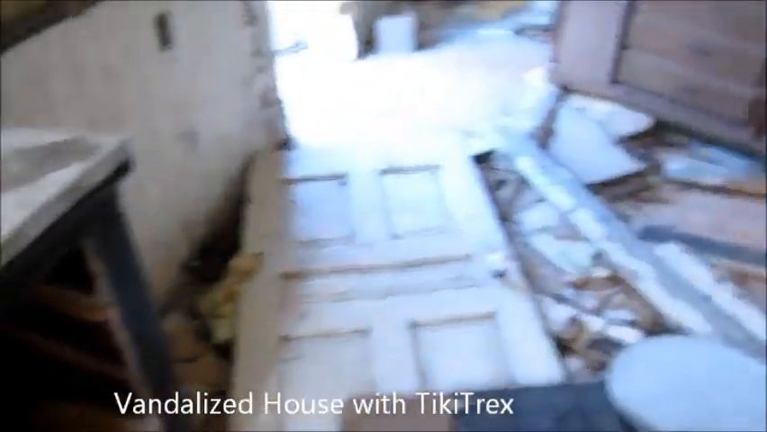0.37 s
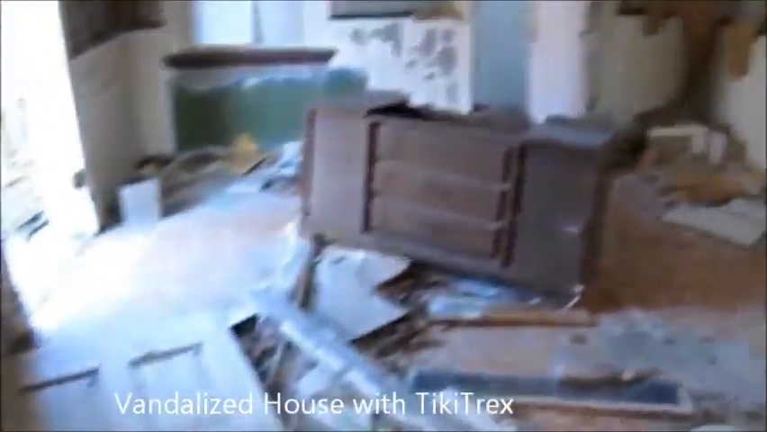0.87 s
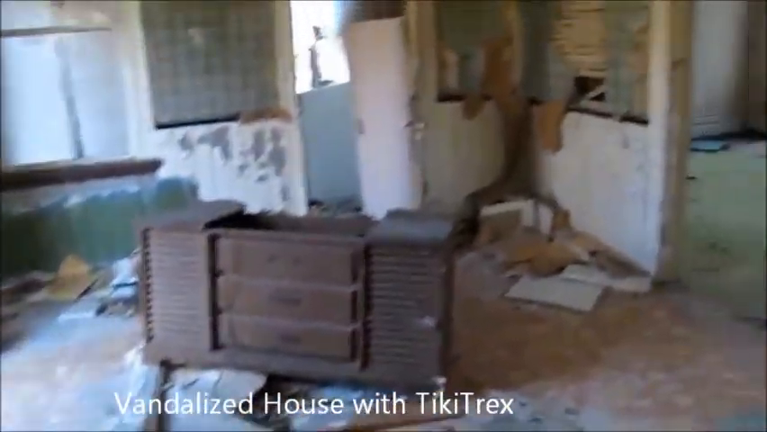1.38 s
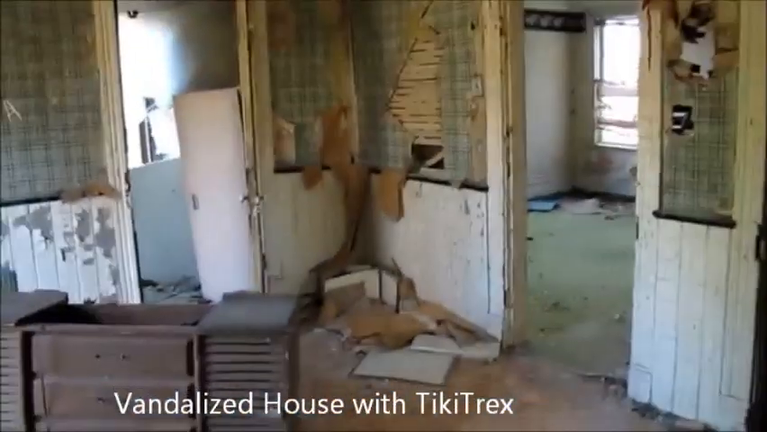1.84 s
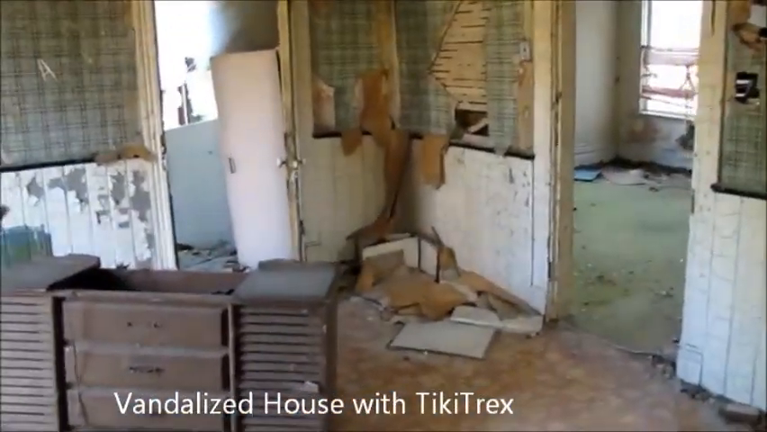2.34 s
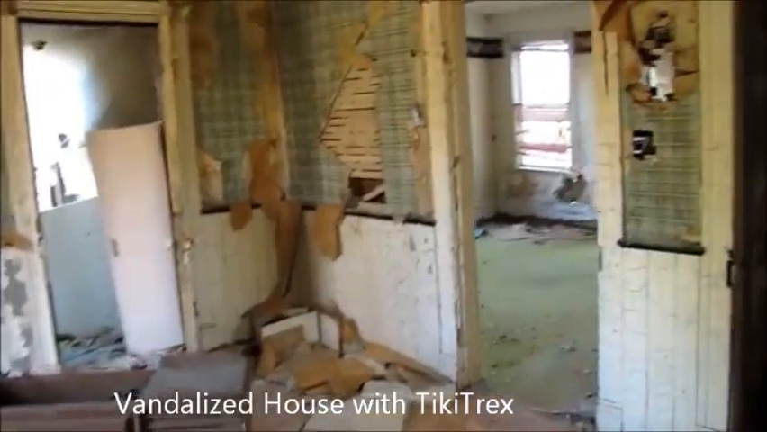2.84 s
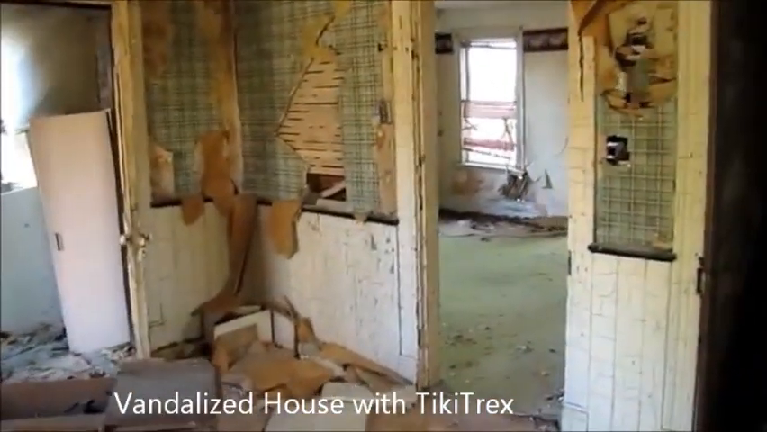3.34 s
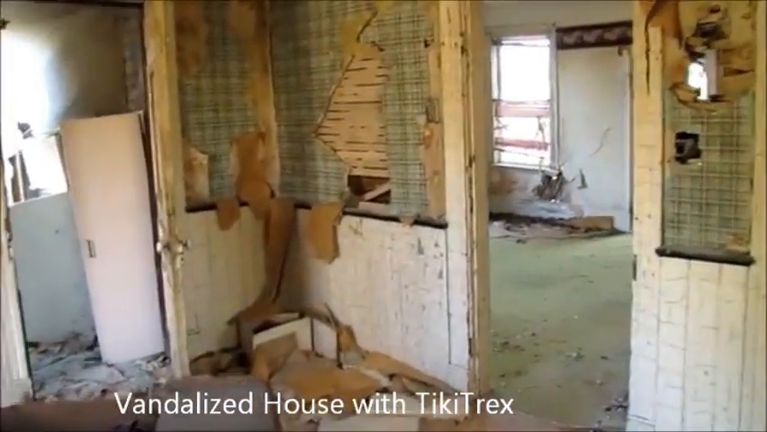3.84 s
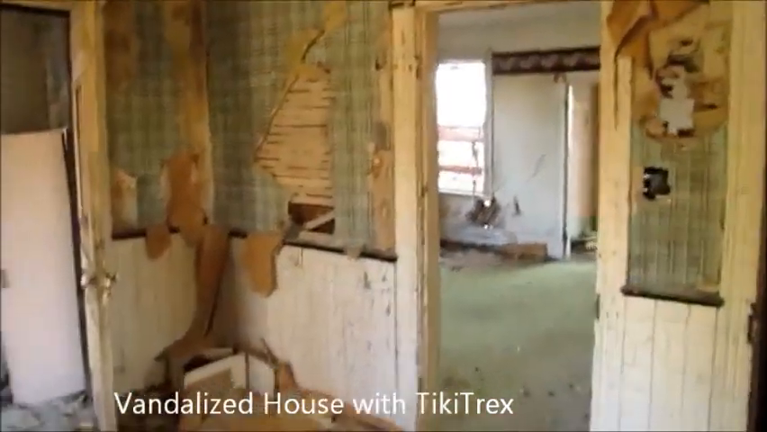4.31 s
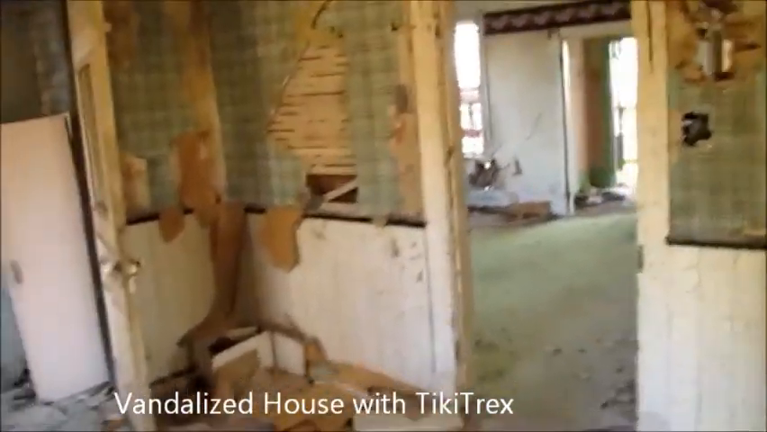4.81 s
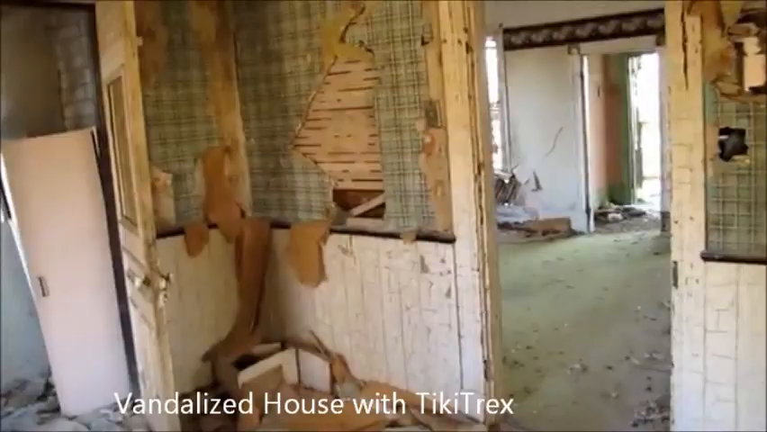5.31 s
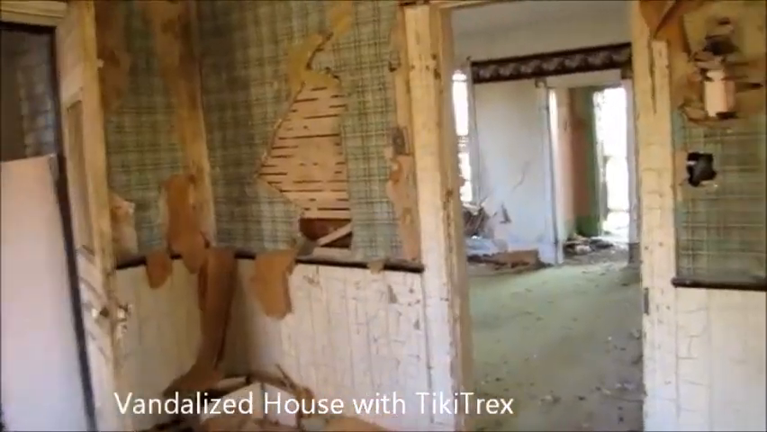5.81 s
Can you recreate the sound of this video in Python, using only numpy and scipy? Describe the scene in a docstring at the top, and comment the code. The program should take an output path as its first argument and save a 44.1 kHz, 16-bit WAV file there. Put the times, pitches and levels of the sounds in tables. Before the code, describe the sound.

In a bare, abandoned house, someone moves slowly over a wooden floor strewn with debris, heard close in stereo. From 0 to 1 s there are only small grit crunches and dry ticks. Soft steps land around 1.0 and 1.27 s, with low air bumps near 1.4 s. At 1.7 s a crunching step kicks a loose shard, which clinks with a short hollow ring. A lone dull thump follows at 2.7 s, then a sharp splintery crackle at 3.2 s and a lull with light ticks. At 4.1 s a knock leads into a loud, rumbling clatter of boards from 4.25 to 4.45 s, with crunches and snaps; more scuffing knocks continue to 5.3 s. Near 5.06 s a higher shard clacks and briefly squeaks. It then quietens, with air jolts around 6 s. A faint outdoor hush, low hum and brief faint whines lie behind; the room echoes shortly.

```python
"""Someone walks across a littered wooden floor in a bare, empty house; the bare walls ring on after each step.
Soles knock on the boards (struck modes and a bare push), crush grit (clumped ringing crumbs) and snap
splinters (cracks with a short ring). Two loose shards are kicked (struck modes); one squeaks (gliding sine).
Behind: an outdoor hush (shaped noise), a low hum and faint whines (wavering sines), puffs and jolts of air
on the microphones (low noise and single swings)."""
import sys
import numpy as np
from scipy import signal
from scipy.io import wavfile
from scipy.ndimage import map_coordinates

SR = 44100
rng = np.random.default_rng(int(sys.argv[2]) if len(sys.argv) > 2 else 0)


def boost_factor(decibels):
    """Convert a level in decibels to a linear amplitude factor."""
    exponent = np.asarray(decibels, float) / 20
    return 10 ** exponent


def log_audio(samples):
    """Write samples as a 16-bit WAV file to the path given in sys.argv[1]."""
    # one column per channel
    frames = np.atleast_2d(samples).T
    # limit to full scale, then quantise
    limited = np.clip(frames, -1, 1)
    pcm = np.round(limited * 32767).astype(np.int16)
    wavfile.write(sys.argv[1], SR, pcm)


N = 272582

# Soles on the boards. Each row: time in seconds, strength in dB, centre of the modes struck in Hz,
# spread in octaves.
KNOCKS = [(1.013, -35, 935, 0.088), (1.082, -20.5, 1200, 0.13), (1.091, -26.5, 300, 0.31),
          (1.266, -25, 324, 0.22), (1.691, -32, 900, 1.1), (1.699, -20, 332, 0.32), (1.718, -15, 356, 0.39),
          (1.727, -17.5, 400, 0.44), (1.738, -22, 320, 0.24), (1.956, -25, 380, 0.81),
          (1.98, -28.5, 300, 0.84), (2.724, -8.5, 270, 0.33), (2.726, -12, 680, 0.3), (2.735, -22, 610, .6),
          (2.75, -29.5, 1000, 0.72), (2.726, -30, 2000, 0.49), (2.769, -14, 302, 0.23),
          (3.1955, -31.5, 686, 0.74), (3.2022, -19, 790, 0.56), (3.219, -26, 577, 0.77),
          (3.826, -37.5, 500, 1.2), (3.959, -27, 347, 2.04), (4.017, -27.5, 247, 1.5),
          (4.118, -30, 685, 0.4), (4.12, -11.5, 214, 0.43), (4.256, -22.5, 900, 0.53),
          (4.267, -5.5, 258, 1.3), (4.286, -13.5, 500, 1), (4.301, -10, 454, 1.5), (4.312, -8.5, 1300, 0.7),
          (4.322, -10.5, 610, 0.67), (4.333, -13.5, 1000, 1.2), (4.344, -13, 395, 1.7),
          (4.374, -6, 400, 1.3), (4.3822, -12, 350, 0.84), (4.388, -28, 204, 1), (4.396, -7.5, 258, 0.76),
          (4.406, -8, 260, 1.07), (4.42, -9, 238, 0.9), (4.431, -13, 200, 0.68), (4.445, -9.5, 500, 0.65),
          (4.584, -15, 590, 1.4), (4.744, -13, 203, 1.24), (4.756, -13, 330, 0.62),
          (4.82, -16.5, 560, 0.64), (4.8274, -19, 797, 0.77), (5.056, -17, 636, 0.86),
          (5.172, -20, 670, 0.42), (5.186, -16, 680, 0.61), (5.2228, -3, 376, 0.6),
          (5.2278, -14, 1000, 0.39), (5.233, -14.5, 596, 0.57), (5.245, -14.5, 553, 0.52),
          (5.289, -15.5, 220, 0.74), (5.349, -28.5, 250, 1.7)]
# Modes of the boards. Each row: pitch in Hz, relative level in dB, t60 in seconds.
BOARD_MODES = [(139.4, 7, 0.093), (157, 3.5, 0.17), (172.4, 1.5, 0.22), (200.4, 3.5, 0.074),
               (236.3, 3.5, 0.078), (292, 3, 0.081), (334, 1, 0.067), (382, 5, 0.056), (423, 3.5, 0.068),
               (500, 5.5, 0.022), (560, 10, 0.018), (673, 4.5, 0.071), (777, 7, 0.024), (870, 7, 0.015),
               (947, 0.5, 0.072), (1069, 3, 0.04), (1200, 3, 0.031), (1300, -11, 0.0153),
               (1440, -2.5, 0.053), (1635, -1, 0.033), (1890, -7.5, 0.022), (2050, 7.5, 0.025),
               (2460, -2.5, 0.021)]
# Weight dragged over the boards. Each row: time in seconds, rms drive into the modes in dB.
DRAG = [(0, -105), (0.6, -101.5), (0.95, -100), (1.15, -112), (1.7, -109), (2.0, -106), (2.15, -106),
        (3.3, -109), (3.6, -105), (4.0, -120), (4.15, -86.5), (4.43, -77), (4.56, -85.5), (4.6, -78),
        (4.7, -71.5), (4.73, -97), (4.89, -108), (4.95, -76), (5.05, -105), (6.18, -112)]
KNOCK_SHARE_DB = -12.5   # what a single mode takes of a knock
BOARD_CUT_HZ, SOLE_CUT_HZ = 130.5, 3200
THUD_DB, THUD_CYCLES, THUD_CUT_HZ = -6, 2, 1400   # push against the knock's strength; t60 in cycles

# Soles crushing grit. Each row: time of the peak in seconds, level of the crumbs at 4 kHz in dB,
# seconds to rise 20 dB, seconds to fall 20 dB (both at least 1 ms when used), brightness in dB per octave.
CRUNCHES = [(0.0, -53, .01, -0.0478, 14), (0.191, -60, -0.14, 0.07, 3), (0.246, -63.5, 0.2, 0.24, 0.5),
            (0.406, -56.5, 0.08, 0.08, 1.5), (0.505, -70.5, 0.47, 0.8, -1.5), (0.96, -58, .002, .012, 2),
            (1.025, -60, 0.1, 0.22, -0.5), (1.133, -56, 0.21, 0.24, 0.5), (1.268, -50, .003, .025, 0),
            (1.27, -64, 0.15, 0.55, 0), (1.383, -55, -0.01, 0.03, 2.5), (1.646, -48, -0.1663, -0.08, 6),
            (1.71, -39.5, 0.0049, 0.0252, -4), (1.75, -41, 0.002, 0.025, -2), (1.868, -61, 0.2, 0.4, -3),
            (1.995, -57, 0.11, 0.09, -0.5), (2.258, -78, 0.7, 1.5, -5.5), (2.748, -72, -0.4, 0.3, -6),
            (3.21, -47.5, 0.0221, 0.085, -1), (3.4, -64, 0.4, 0, 2), (3.748, -67, 0.5, 0.3, 5),
            (4.14, -68, 0.56, 1, 2.5), (4.268, -43.5, 0.0377, 0.16, -4), (4.446, -40, 0.004, 0.07, -3.5),
            (4.47, -49, 0.0333, 0.1058, -5), (4.591, -49.5, 0.09, 0.1257, -6),
            (4.718, -56, 0.0161, 0.1131, -4), (4.835, -64.5, 0.45, 0.3252, -9),
            (4.898, -48, -0.08, 0.1728, 0.5), (4.944, -51.5, 0.1, .1, -0.5),
            (5.059, -66.5, -0.07, 0.17, -11.5), (5.36, -59.5, -0.02, 0.03, -4.5),
            (6.18, -58.5, -0.02, 4, -3.5)]
GRIT_FLOOR_DB, GRIT_FLOOR_TILT_DB = -93.5, 1   # steady grit: level at 4 kHz, brightness per octave
GRIT_KNEE_HZ, GRIT_TOP_DB = 6560, -10.5   # the finest crumbs are fewer: change per octave above the knee

# Splinters and flakes that snap. Each row: time in seconds, level of the ring in dB, pitch in Hz,
# t60 in seconds, bare crack against the ring in dB.
SNAPS = [(0.211, -27, 2850, 0.001, -7), (0.244, -24.5, 3530, 0.0015, -27), (0.325, -41, 2940, 0.002, -10),
         (0.384, -33, 1370, 0.01, -8.5), (0.4038, -19, 3000, 0.001, -3.5),
         (0.5046, -27, 8700, 0.00085, 12.5), (0.9577, -30.5, 6520, 0.0015, -11),
         (1.017, -23, 2520, 0.0013, -12.5), (1.2665, -19, 3700, 0.0025, -3),
         (1.640, -23, 4260, 0.0022, -3.5), (1.6726, -46, 3130, 0.0016, -6), (1.7028, -30, 3070, 0.001, -9),
         (1.7487, -18, 4300, 0.00084, -12), (1.7585, -22, 4900, 0.002, -23.5), (1.96, -41, 2130, .002, -12),
         (2.226, -23, 2520, 0.00086, -10), (2.466, -38, 3630, 0.0015, -5),
         (3.1939, -13, 11100, 0.00069, 6.5), (3.1956, -11.5, 5000, 0.0015, 1.5),
         (3.2095, -10.5, 3130, 0.001, -7), (3.2185, -24, 4460, 0.0022, -5),
         (3.738, -30.5, 3440, 0.0025, -16), (3.861, -43, 6000, .002, -4),
         (3.9095, -27.5, 8000, 0.00091, -25), (4.2575, -28, 2500, 0.0011, -5.5),
         (4.303, -13, 3530, 0.0012, 4), (4.446, -8, 1990, 0.0042, -14.5), (4.452, -9, 2000, .008, -15.5),
         (4.459, -12.5, 2290, 0.0071, -12), (4.58, -16.5, 2320, 0.0028, -3),
         (4.7155, -18.5, 3800, 0.0019, 1), (4.717, -28, 1620, 0.024, -20),
         (4.825, -16.5, 2800, 0.0046, -11), (4.836, -15.5, 2050, 0.012, -18),
         (4.843, -24.5, 2930, 0.011, -13.5), (4.933, -16, 3000, 0.0025, -10.5),
         (4.8971, -14, 3000, 0.00058, -24), (5.0573, -21.5, 2300, 0.0088, -10),
         (5.352, -32, 6120, 0.00086, -14), (6.145, -39, 2960, 0.0018, -4)]
SPLINTER_S, SPLINTER_DB = 0.0055, -5   # time to fade to a third; level against the first crack

# Modes of the two loose shards. Each row: pitch in Hz, relative level in dB, t60 in seconds.
LOW_SHARD_MODES = [(312.5, -6, 0.4), (540, -16, .2), (802, -11, 0.25), (868, -11, 0.15), (937, -7, 0.32),
                   (996, -10, 0.15), (1000, 6, 0.03), (1061, -10, 0.22), (1136, -12, 0.12),
                   (1450, -8, 0.03), (2560, -12, 0.02)]
HIGH_SHARD_MODES = [(1680, 2, 0.05), (1850, -3, .04), (1922, -14, 0.2), (2110, 2, 0.05), (2309, -6, 0.1),
                    (2730, -16, .03), (3900, -20, .08), (6500, -12, .08)]
# Blows on the shards. Each row: time in seconds, strength in dB, centre of the modes struck in Hz.
LOW_BLOWS = [(1.7488, -8, 950), (1.7592, -6, 1100), (1.779, -15, 1000), (1.7935, -15, 900),
             (1.8085, -15, 1000), (1.832, -21, 850)]
HIGH_BLOWS = [(5.0564, -14, 1900), (5.061, -9, 1900), (5.069, -16, 2100), (5.1005, -20.5, 1980)]
BLOW_SHARE_DB = -10.5   # what a single mode takes of a blow
BLOW_SPREAD_OCTAVES, BLOW_CUT_HZ = 2.2, 4300
# Squeak of the skidding high shard. Each row: time in seconds, pitch in Hz, level in dB.
SQUEAK = [(5.073, 2040, -40), (5.0765, 2000, -13), (5.085, 1955, -13.5), (5.091, 1925, -15),
          (5.096, 1895, -23), (5.105, 1900, -36), (5.11, 1925, -24), (5.119, 1925, -24), (5.124, 1925, -32),
          (5.137, 1935, -34), (5.142, 1930, -27), (5.16, 1925, -31), (5.175, 1920, -40), (5.2, 1925, -35),
          (5.25, 1925, -46)]
SHARD_LEFT_DB = -1   # gain on the left, opposite on the right

# Echoes of the room. Each row: frequency in Hz, t60 in seconds, relative level in dB.
ROOM = [(100, 0.33, -4), (300, 0.38, -1.5), (1000, 0.29, -0.5), (3000, 0.25, 5.5), (8000, 0.15, 4.5),
        (14060, 0.15, 1)]
# Left-right likeness of room and hush. Each row: frequency in Hz, correlation.
LIKENESS = [(60, 1), (250, 0.96), (500, 0.89), (1000, 0.72), (2000, 0.32), (4000, 0.049), (12000, 0.039)]
SNAP_ROOM_DB = -5    # dry snaps carry less room than the boards
SHARD_ROOM_DB, SQUEAK_ROOM_DB = -6.5, -16   # the shards lie close: less room on them
# The microphones turn. Each row: time in seconds, lag of the right port in seconds (negative leads).
RIGHT_LAG = [(0, .00009), (1.3, .00009), (1.6, -.00009), (2.3, -.00007), (2.6, .00007), (3.7, .00008),
             (4.2, .00003), (5.0, .00006), (6.18, .00006)]

# Steady air on the ports. Each row: time in seconds, level in dB.
DRAUGHT = [(0, -50), (0.7, -51), (1.1, -39.5), (1.9, -42.5), (2.2, -47), (2.7, -48.5), (2.86, -35.5),
           (2.98, -41.5), (3.3, -58), (3.8, -50.5), (4.2, -41.5), (4.6, -68.5), (5.2, -48), (5.6, -57.5),
           (6.18, -39.5)]
# Puffs of air on the ports. Each row: time of the peak in seconds, level in dB.
PUFFS = [(0.81, -39.5), (0.95, -44.5), (1.099, -40.5), (1.389, -32), (1.481, -32.5), (1.56, -34),
         (1.691, -36.5), (1.98, -44), (2.74, -47), (3.84, -61), (4.041, -33), (4.13, -35), (4.3, -25.5),
         (4.53, -44.5), (4.84, -33), (5.951, -29.5), (6.01, -24.5), (6.14, -32)]
PUFF_RISE_S, PUFF_FALL_S = 0.056, 0.11   # for 20 dB
PORT_CUT_HZ, PORTS_LEFT_DB = 39.3, -1.6   # gain on the left, opposite on the right
# Blunt jolts of air. Each row: time in seconds, peak in dB, length in seconds, left over right in dB.
JOLTS = [(1.391, -28, .012, 0), (1.465, -32, .02, 0), (1.48, -31, .014, 0), (1.495, -31, .012, 0),
         (5.934, -38, .016, 0), (5.957, -36, .018, 0), (5.9852, -29, .004, 14), (5.9872, -23.5, .011, 14),
         (6.006, -33, .012, -10), (6.019, -27, .009, -12), (6.034, -32, .0055, 12), (6.0414, -24, .007, 12),
         (6.1525, -28, .009, -10)]

# Spectrum of the hush. Each row: frequency in Hz, relative density in dB per Hz.
HUSH = [(60, -6.5), (120, -4), (250, -9), (500, -12), (900, -13), (1500, -13.5), (2500, -21.5),
        (4500, -24.5), (8000, -33.5), (12000, -35), (15500, -54)]
# Loudness of the hush. Each row: time in seconds, level in dB.
HUSH_LEVEL = [(0, -48.5), (1, -51.5), (2, -49.5), (3, -49.5), (4, -49), (5.0, -38.5), (5.3, -50.5),
              (5.5, -60.5), (6.18, -54.5)]
# Loudness of the hum. Each row: time in seconds, level in dB.
HUM_LEVEL = [(0, -53.5), (2.0, -48.5), (2.4, -48.5), (3.1, -49), (3.9, -43.5), (5.0, -48), (5.5, -53),
             (6.18, -49)]
HUM_HZ = 52.4
# One list per faint whine. Each row: time in seconds, pitch in Hz, level in dB.
WHINES = [
    [(1.38, 11600, -87), (1.4, 11600, -66), (1.44, 11450, -56), (1.5, 11500, -80)],
    [(2.04, 1480, -75), (2.1, 1495, -62), (2.25, 1560, -63), (2.38, 1487, -58), (2.43, 1300, -58),
     (2.48, 1350, -76)],
    [(2.9, 1360, -69), (2.98, 1366, -62.5), (3.1, 1360, -65), (3.18, 1360, -92)],
]

LEFT_DB, TOP_HZ = -0.36, 13400   # whole mix: left gain, opposite on the right; microphone roll-off


def boards():
    """A knock strikes the modes near its centre; the dragged sole keeps all of them muttering."""
    s, knock_db, centre_hz, spread = np.transpose(KNOCKS)
    octaves = np.log2(np.array(BOARD_MODES)[:, 0] / centre_hz[:, None])
    chance_db = rng.normal(0, 2.5, octaves.shape)
    off_centre_db = -6 * (octaves / spread[:, None]) ** 2
    strengths_db = knock_db[:, None] + KNOCK_SHARE_DB + off_centre_db + chance_db
    mutter = boost_factor(in_time(DRAG)[0]) * rms_one(grains(1500, spread_db=6.5))
    signs = np.where(np.arange(len(BOARD_MODES)) % 3 == 2, -1, 1)   # every third mode starts the other way
    # boards couple poorly to air in the deep bass
    radiating = signal.butter(4, BOARD_CUT_HZ, "high", fs=SR, output="sos")
    # a sole is a soft hammer
    soft = signal.butter(2, SOLE_CUT_HZ, fs=SR, output="sos")
    ringing = strike(BOARD_MODES, s, strengths_db, mutter, signs)
    return signal.sosfilt(np.vstack([radiating, soft]), ringing)


def thuds():
    """The sole first pushes the board down: a swing or two at the knock's own pitch."""
    out, click = np.zeros(N), signal.unit_impulse(4000)
    for s, knock_db, hz, _ in KNOCKS:
        at = round(s * SR)
        out[at:at + 4000] -= boost_factor(knock_db + THUD_DB) * ring(click, hz, THUD_CYCLES / hz)
    return lowpass(out, THUD_CUT_HZ)


def grit():
    """Thousands of crumbs a second ring a few cycles each; small bright ones win in a bright crunch."""
    s, level_db, rise_s, fall_s, tilt_db = np.transpose(CRUNCHES)
    crumbs = grains(14000, spread_db=5.0)
    pitches_hz = np.geomspace(700, 13500, 24)
    dealt = rng.integers(0, len(pitches_hz), N)   # which pitch a crumb gets
    swell, out = swells(s, rise_s, fall_s), 0
    for k, hz in enumerate(pitches_hz):
        octaves = np.log2(hz / 4000)
        power = boost_factor(level_db + tilt_db * octaves) ** 2 @ swell
        power = power + boost_factor(GRIT_FLOOR_DB + GRIT_FLOOR_TILT_DB * octaves) ** 2
        top_loss = boost_factor(GRIT_TOP_DB * max(np.log2(hz / GRIT_KNEE_HZ), 0))
        ringing = rms_one(ring(crumbs * (dealt == k), hz, 3.5 / hz))
        out = out + full_rate(power) * top_loss * ringing
    return out


def snaps():
    """A bare crack with a short ring at its own pitch; the break crackles on for a few ms."""
    out, t = np.zeros(N), np.arange(2000) / SR
    chance = rng.random((len(SNAPS), 2, len(t)))
    for (s, level_db, hz, t60, crack_db), (size, born) in zip(SNAPS, chance):
        at = round(s * SR)
        crackle = (2 * size - 1) * (born < 3000 / SR)   # about 3000 clicks a second
        clicks = boost_factor(SPLINTER_DB) * crackle * np.exp(-t / SPLINTER_S)
        clicks[0] = 1
        snap = boost_factor(level_db) * (ring(clicks, hz, t60) + boost_factor(crack_db) * clicks)
        out[at:at + 2000] += snap[:N - at]
    return out


def shard(modes, blows):
    """Each blow strikes the modes near its centre hardest; the contact is slightly soft."""
    s, blow_db, centre_hz = np.transpose(blows)
    octaves = np.log2(np.array(modes)[:, 0] / centre_hz[:, None])
    off_centre_db = -6 * (octaves / BLOW_SPREAD_OCTAVES) ** 2
    chance_db = rng.normal(0, 1, octaves.shape)
    strengths_db = blow_db[:, None] + BLOW_SHARE_DB + off_centre_db + chance_db
    return lowpass(strike(modes, s, strengths_db), BLOW_CUT_HZ)


def squeak():
    """A clean tone that sags as the skid slows, then flutters out."""
    t, (hz, level_db) = np.arange(N) / SR, in_time(SQUEAK)
    sounding = (t > SQUEAK[0][0]) * (t < SQUEAK[-1][0])
    return sounding * boost_factor(level_db) * np.sqrt(2) * np.sin(2 * np.pi * np.cumsum(hz) / SR)


def room(x, count=5):
    """Feet and listener keep moving, so the sound wanders between spots that echo differently."""
    shares = np.array([drift(8) for spot in range(count)])
    shares /= np.sqrt(np.sum(shares ** 2, axis=0))
    return sum(signal.fftconvolve((share * x)[None], reflections(), axes=1)[:, :N] for share in shares)


def reflections(build_s=0.008):
    """Dense echoes from one spot: they build up in a few ms and die band by band."""
    size = SR * 2 // 3
    t, echoes = np.arange(size) / SR, 0
    for hz, band in stereo_bands(size):
        t60 = at_hz(ROOM, hz)
        per_energy = np.sqrt(6 * np.log(10) / t60 / SR)   # level independent of the decay time
        echoes = echoes + band * boost_factor(at_hz(ROOM, hz, axis=2) - 60 * t / t60) * per_energy
    return echoes * (1 - np.exp(-t / build_s))


def puffs(shared=0.66):
    """Lumpy low turbulence, partly its own at each port: a draught with short puffs on top."""
    s, level_db = np.transpose(PUFFS)
    flow = full_rate(boost_factor(level_db) ** 2 @ swells(s, PUFF_RISE_S, PUFF_FALL_S))
    flow = flow + boost_factor(in_time(DRAUGHT)[0] + 0.79 * drift(4.9))
    common, *own = rng.standard_normal((3, N))
    noise = shared * common + (1 - shared) * 2 * np.array(own)
    low = lowpass(noise, PORT_CUT_HZ)
    low = signal.sosfilt(signal.butter(2, 20.0, "high", fs=SR, output="sos"), low)
    gain_db = 2.8 * drift(22) + PORTS_LEFT_DB * np.array([[1], [-1]])
    return flow * boost_factor(gain_db) * rms_one(low)


def jolts():
    """Pressure jumps up and drops back through zero once."""
    t, out = np.arange(N) / SR, 0
    for s, peak_db, length_s, pan_db in JOLTS:
        u = np.clip(4 * (t - s) / length_s, -9, 9)
        level = boost_factor(peak_db + pan_db / 2 * np.array([[1], [-1]]))
        out = out - level * u * np.exp((1 - u ** 2) / 2)
    return out


def hush(patchy_db=1.5):
    """Smooth outdoor noise through the open windows; each band drifts a little in level."""
    noise = sum(band * boost_factor(at_hz(HUSH, hz) + patchy_db * drift(12.0)) for hz, band in stereo_bands(N))
    return boost_factor(in_time(HUSH_LEVEL)[0]) * rms_one(noise)


def hum(waver=0.0467):
    """A near sine that wavers in pitch and strength, a little differently at each port."""
    level_db, out = in_time(HUM_LEVEL)[0], []
    phase = 2 * np.pi * np.cumsum(HUM_HZ * (1 + waver * drift(6.1))) / SR
    for port in range(2):
        level = boost_factor(level_db + 2.4 * drift(3.7))
        out.append(level * np.sqrt(2) * np.sin(phase + 0.43 * drift(2.2)))
    return np.array(out)


def whines(waver=0.0039):
    """Near sines whose pitch and strength waver."""
    t, out = np.arange(N) / SR, 0
    for rows in WHINES:
        hz, level_db = in_time(rows)
        sounding = (t > rows[0][0]) & (t < rows[-1][0])
        phase = 2 * np.pi * np.cumsum(hz * (1 + waver * drift(43))) / SR
        out = out + sounding * boost_factor(level_db + 5.0 * drift(25)) * np.sqrt(2) * np.sin(phase)
    return out


def strike(modes, times_s, strengths_db, steady=0, signs=None):
    """Blows (one row of strengths each) and a steady drive set every mode of a body ringing."""
    at, out = np.round(np.asarray(times_s) * SR).astype(int), np.zeros(N)
    for k, (hz, level_db, t60) in enumerate(modes):
        drive = np.zeros(N) + steady
        drive[at] += boost_factor(strengths_db[:, k]) * (1 if signs is None else signs[k])
        out += boost_factor(level_db) * ring(drive, hz, t60)
    return out


def ring(clicks, hz, t60):
    """Two-pole resonator: a unit click sets a decaying sine of height 1 ringing."""
    r, w = boost_factor(-60 / (max(t60, 1e-3) * SR)), 2 * np.pi * hz / SR
    return signal.lfilter([0, np.sin(w)], [1, -2 * r * np.cos(w), r * r], clicks + 1e-18)


def grains(per_s, spread_db):
    """Random clicks in clumps, a few much larger than the rest."""
    sizes = boost_factor(spread_db * np.minimum(rng.exponential(1, N), 4)) * rng.choice([-1, 1], N)
    return sizes * (rng.random(N) < per_s * boost_factor(3 * drift(25)) / SR)


def swells(s, rise_s, fall_s):
    """Power of each swell every 32 samples: it climbs and drops at a steady rate in dB."""
    late_s = np.arange(0, N + 32, 32) / SR - np.reshape(s, (-1, 1))
    rise_s, fall_s = (np.maximum(np.reshape(x, (-1, 1)), 1e-3) for x in (rise_s, fall_s))
    return boost_factor(40 * np.minimum(late_s / rise_s, -late_s / fall_s))   # 40 here is 20 dB of power


def full_rate(power):
    """Amplitude at every sample from power at every 32nd."""
    return np.interp(np.arange(N) / 32, np.arange(len(power)), np.sqrt(power))


def stereo_bands(size):
    """Half-octave bands of stereo noise, alike in the bass and unrelated in the treble."""
    edges_hz = 40 * 2 ** np.arange(0, 9.1, 0.5)
    white = rng.standard_normal((2, 2, size))
    for k, (low, high) in enumerate(zip(edges_hz, edges_hz[1:])):
        band = signal.butter(2, [low, high], "band", fs=SR, output="sos")
        mid, side = signal.sosfilt(band, white[k % 2])   # neighbouring bands use different noise
        hz = np.sqrt(low * high)
        alike = np.clip(at_hz(LIKENESS, hz), -1, 1)
        yield hz, np.sqrt(1 + alike) * mid + np.sqrt(1 - alike) * side * [[1], [-1]]


def drift(rate_hz):
    """Slow chance of spread 1: low-passed noise drawn every 40 samples."""
    r = np.exp(-80 * np.pi * rate_hz / SR)
    noise = rng.standard_normal(N // 40 + 2002)
    slow = signal.lfilter([1], [1, -2 * r, r * r], noise)[2000:]
    return np.interp(np.arange(N) / 40, np.arange(len(slow)), rms_one(slow))


def lowpass(x, cut_hz):
    """Second-order low-pass."""
    return signal.sosfilt(signal.butter(2, cut_hz, fs=SR, output="sos"), x)


def rms_one(x):
    """Scale to rms 1."""
    return x / np.sqrt(np.mean(x ** 2) + 1e-20)


def in_time(rows):
    """Columns of a curve, at every sample."""
    s, *columns = np.transpose(rows)
    return [np.interp(np.arange(N) / SR, s, c) for c in columns]


def at_hz(points, hz, axis=1):
    """Read a column of a table on a log-frequency axis."""
    return np.interp(np.log(hz), np.log(np.array(points)[:, 0]), np.array(points)[:, axis])


def scene():
    """Everything underfoot is heard directly, a little earlier at the nearer port, and through the room."""
    floor, cracks, skid = boards() + thuds() + grit(), snaps(), squeak()
    shards = shard(LOW_SHARD_MODES, LOW_BLOWS) + shard(HIGH_SHARD_MODES, HIGH_BLOWS)
    left, right = floor + cracks + (shards + skid) * boost_factor([[SHARD_LEFT_DB], [-SHARD_LEFT_DB]])
    read_at = np.arange(N) - in_time(RIGHT_LAG)[0] * SR
    direct = np.array([left, map_coordinates(right, [read_at], order=3)])
    to_room = floor + boost_factor(SNAP_ROOM_DB) * cracks
    to_room = to_room + boost_factor(SHARD_ROOM_DB) * shards + boost_factor(SQUEAK_ROOM_DB) * skid
    underfoot = direct + room(to_room)
    heard = underfoot + puffs() + jolts() + hush() + hum() + whines()
    return heard * boost_factor([[LEFT_DB], [-LEFT_DB]])


def top_cut(x):
    """Nothing passes above the cut-off."""
    return signal.sosfilt(signal.butter(12, 15100, fs=SR, output="sos"), x)


def record(dry):
    """The microphones roll off at the top and peaks are rounded."""
    soft = signal.sosfilt(signal.butter(3, TOP_HZ, fs=SR, output="sos"), dry)
    mix = 0.59 * np.tanh(soft / 0.8)
    return top_cut(mix)


dry = scene()
out = record(dry)
log_audio(out)
```